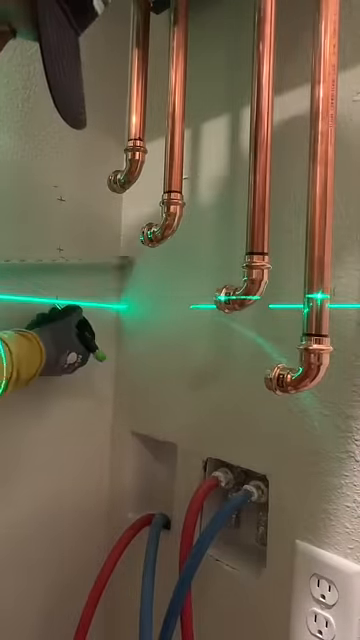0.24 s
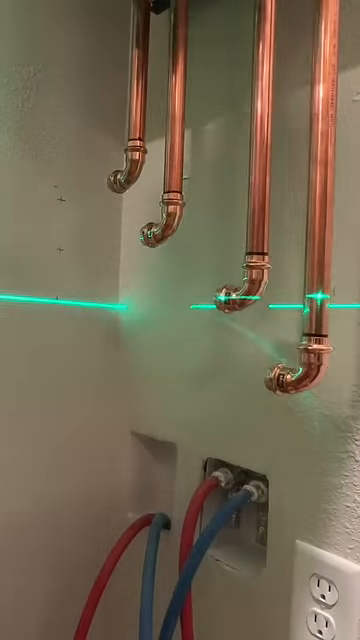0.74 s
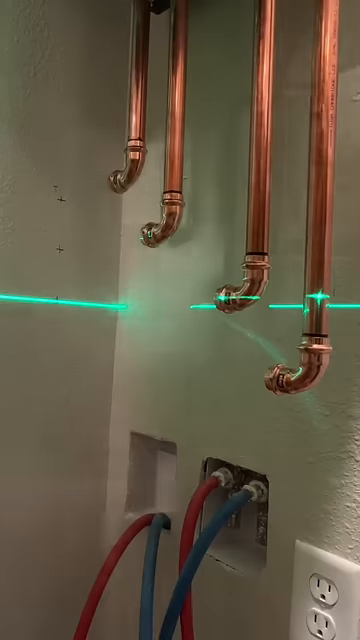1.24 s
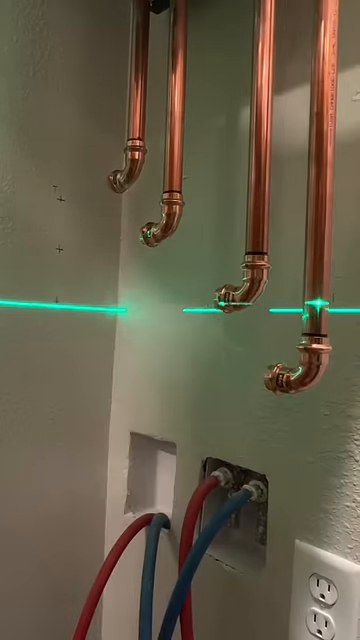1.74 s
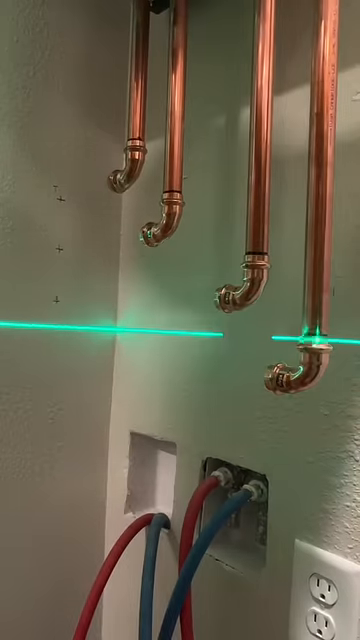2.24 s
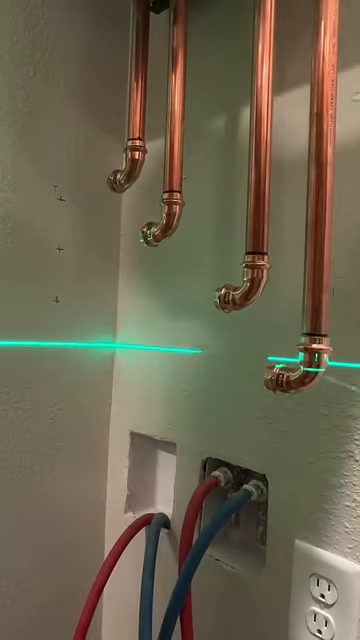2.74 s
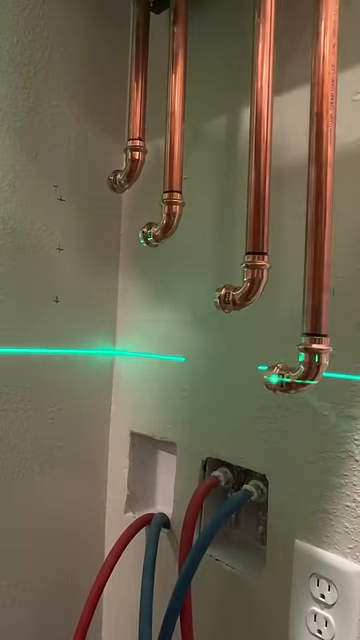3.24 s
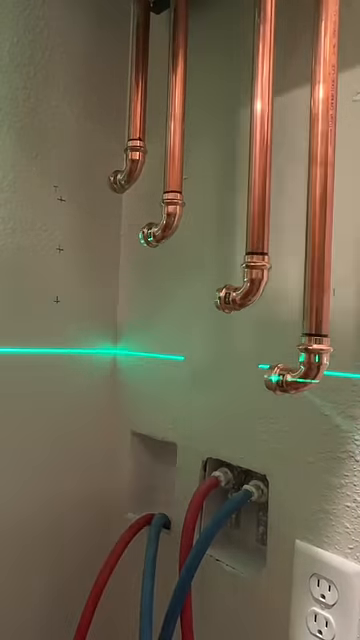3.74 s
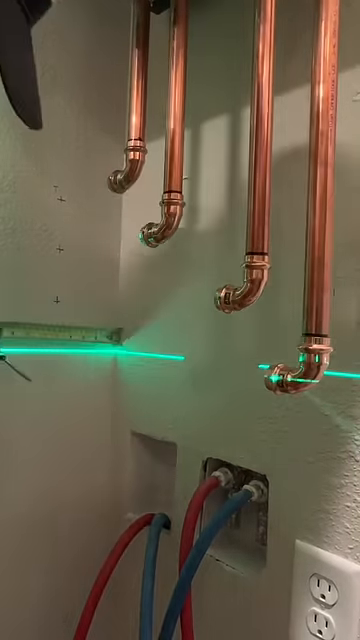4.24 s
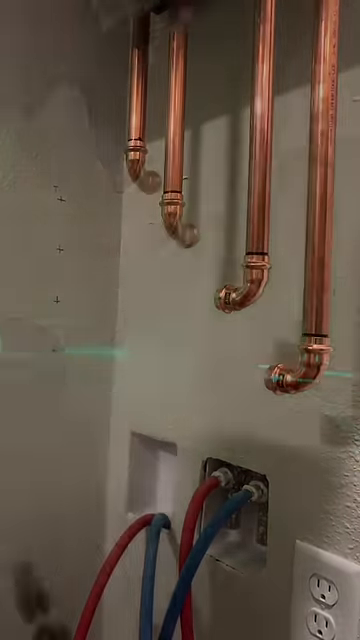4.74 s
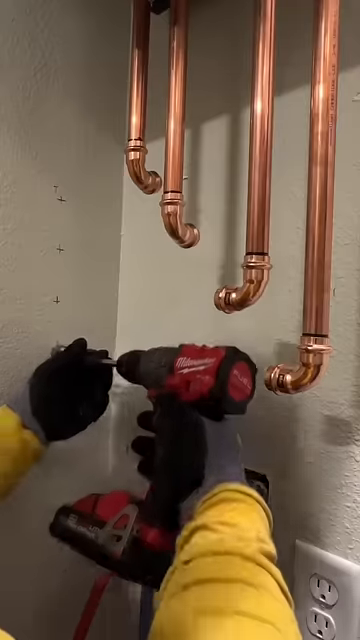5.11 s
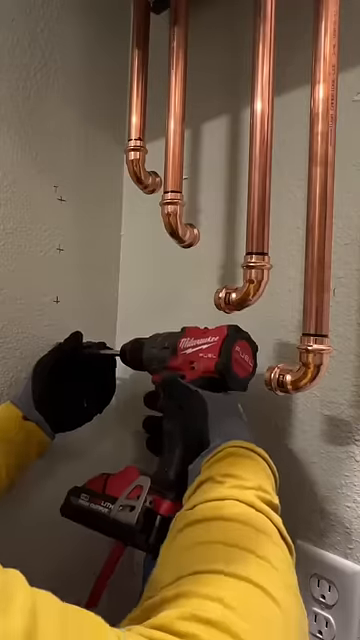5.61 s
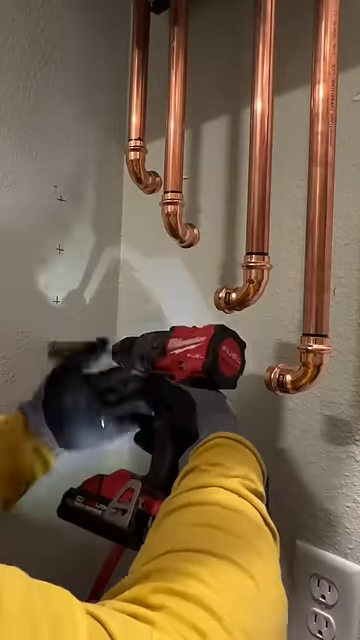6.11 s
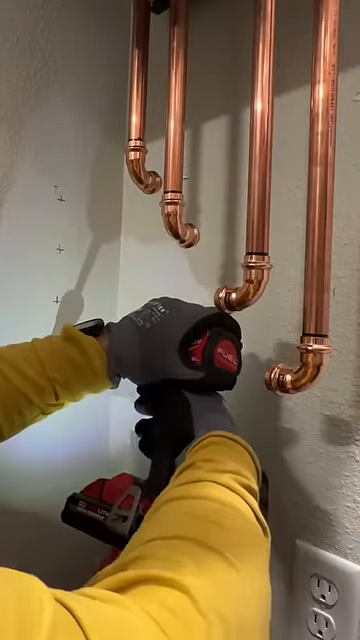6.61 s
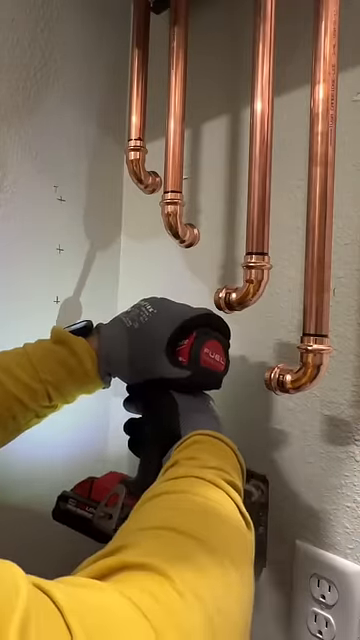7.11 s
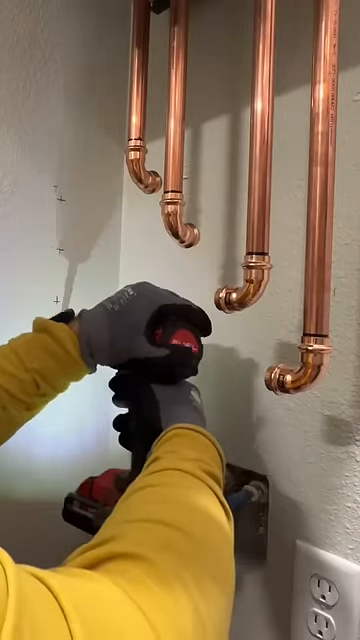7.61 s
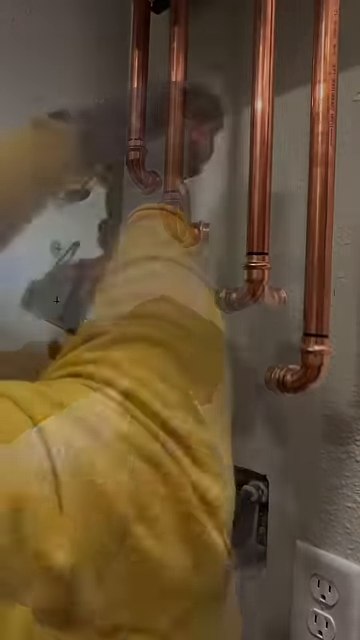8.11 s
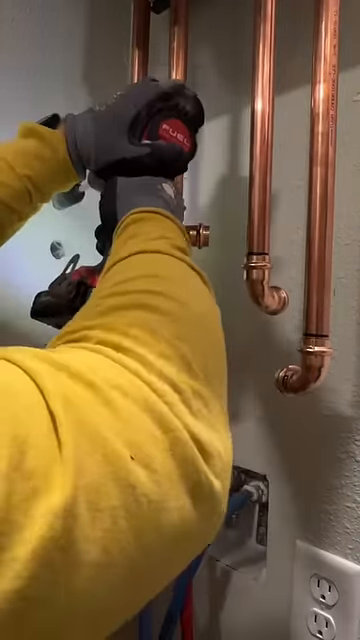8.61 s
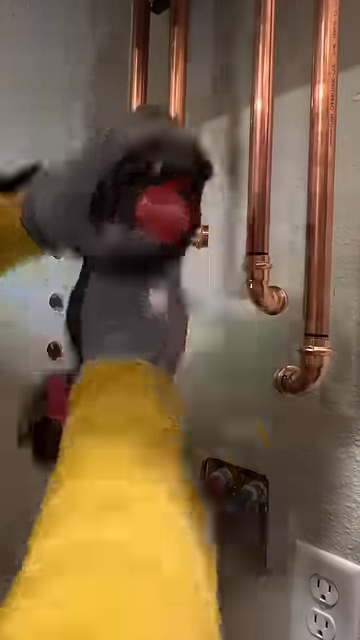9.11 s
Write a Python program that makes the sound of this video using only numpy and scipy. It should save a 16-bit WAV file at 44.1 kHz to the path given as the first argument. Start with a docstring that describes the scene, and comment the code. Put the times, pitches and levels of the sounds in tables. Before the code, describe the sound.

Close handling clatter and hollow wall bumps give way to faint low hums, then a whining power drill pulses, rasps and breaks through a wall.

```python
"""Cloth brushes and a tape measure rattles first, close by in the quiet air of a small bare room.
The tape clacks, hands and tools boom on a hollow plasterboard wall, and a level's stand hums as it is nudged.
Then a cordless drill bites in short trigger pulls and bores through, its bit wobbling.
Coloured noise makes cloth, clacks and rasp; resonators make wall and stand; tone banks make motor and gears.
The stereo microphone also hears echoes off close walls and a short diffuse tail."""
import sys
import numpy as np
from scipy import signal
from scipy.fft import rfft, irfft, next_fast_len
from scipy.io import wavfile

SR = 44100
rng = np.random.default_rng(int(sys.argv[2]) if len(sys.argv) > 2 else 0)


def put_to_file(sound):
    """Save the sound as 16-bit audio at rate SR, in the file named by the first command-line argument."""
    columns = np.atleast_2d(sound).T  # one column per channel
    safe = np.clip(columns, -1, 1)
    whole_steps = np.round(safe * 32767)
    wavfile.write(sys.argv[1], SR, whole_steps.astype(np.int16))


N = 412335
TIME = np.arange(N) / SR


def from_db(db):
    """Decibels to an amplitude factor."""
    return 10 ** (np.asarray(db) / 20)


def rms(x):
    """Root mean square, kept above zero."""
    return np.sqrt(np.mean(x ** 2) + 1e-20)


def decay_rate(t60):
    """Exponential rate of a fall by 60 dB in t60."""
    return np.log(1000) / t60


def in_time(rows):
    """Each column of a curve, sample by sample."""
    s, *columns = np.transpose(rows)
    return [np.interp(TIME, s, c) for c in columns]


def at_hz(points, hz):
    """A spectrum read on a log-frequency axis."""
    point_hz, point_db = np.transpose(points)
    return np.interp(np.log(hz + 1), np.log(point_hz), point_db)


def drift(rate):
    """Smooth chance: straight lines between random knots of spread 1, rate knots a second."""
    knots = rng.standard_normal(4 * 4096)
    return np.interp(TIME * rate, np.arange(len(knots)), knots)


def gate(on, off, rise, t60):
    """An envelope that sets in, holds and runs down."""
    setting_in = np.minimum(TIME - on, 0) / rise
    running_down = decay_rate(t60) * np.maximum(TIME - off, 0)
    return np.exp(np.maximum(setting_in - running_down, -np.log(1e12)))


def swell(s, half_s, squareness=1.61):
    """A rounded hump of height 1."""
    return np.exp(-np.minimum(np.abs((TIME - s) / half_s), 10) ** squareness)


def blows(times, levels_db, t60, rise):
    """An envelope that jumps at each blow and dies away."""
    out, age = np.zeros(N + SR), np.arange(SR) / SR
    for s, db, decay in zip(times, levels_db, np.broadcast_to(t60, len(times))):
        at = max(int(s * SR), 0)
        out[at:at + SR] += from_db(db) * np.exp(-decay_rate(decay) * age) * (1 - np.exp(-age / rise))
    return out[:N]


# stereo spread at the microphone: (frequency [Hz], side minus mid [dB])
SIDE_OVER_MID = [(80, -30.5), (300, -5), (650, -15), (1200, 3.5), (2500, 5.5), (6000, -3.5), (14000, -2.5)]
# stereo balance at the microphone: (frequency [Hz], left minus right [dB])
LEFT_OVER_RIGHT = [(100, -1), (350, -0.5), (700, -2.5), (1400, -2), (2800, 1.5), (5500, 3), (14000, 5)]


def noise(spectrum):
    """Stereo noise of one colour, alike at both ears in the bass and diffuse above; mid rms 1."""
    size = next_fast_len(N, real=True)
    hz = np.arange(size // 2 + 1) * SR / size
    bass_cut = hz ** 2 / (hz ** 2 + 60 ** 2)
    mid, side = rfft(rng.standard_normal((2, size))) * from_db(at_hz(spectrum, hz)) * bass_cut
    sign = np.array([[1], [-1]])   # left, right
    ears = mid + sign * side * from_db(at_hz(SIDE_OVER_MID, hz))
    pair = irfft(ears * from_db(sign * at_hz(LEFT_OVER_RIGHT, hz) / 2), size)[:, :N]
    return pair / rms(pair.mean(axis=0))


def resonate(x, modes):
    """Parallel resonances (frequency [Hz], width [Hz], level [dB]) of alternating sign."""
    out = 0
    for k, (hz, width, db) in enumerate(modes):
        r = np.exp(-np.pi * width / SR)   # pole radius
        gain = (1 - r * r) / 2
        poles = [1, -2 * r * np.cos(2 * np.pi * hz / SR), r * r]
        out = out + (-1) ** k * from_db(db) * signal.lfilter([gain, 0, -gain], poles, x + 1e-18)
    return out


# echoes off the corner and the arm: (delay [s], level [dB])
CORNER_ECHOES = [(.0013, -22.5), (.0031, -16.5), (.0058, -13.5), (.0094, -10), (.0147, -12.5)]


def corner(x):
    """Close walls return a few echoes, a little apart at each ear, that comb the spectrum."""
    out = np.array(x)
    for k, (delay, db) in enumerate(CORNER_ECHOES):
        for ear in (0, 1):
            lag = max(int((delay + 0.00019 * ear * (-1) ** k) * SR), 1)
            out[ear, lag:] += from_db(db) * x[ear, :-lag]
    return out


ROOM_T60_S = .32


def room(x, wet_db):
    """Adds a short diffuse tail from the bare walls."""
    age = TIME[:SR // 2]
    tail = rng.standard_normal((2, len(age))) * np.exp(-decay_rate(ROOM_T60_S) * age)
    tail *= age > .004   # the tail waits 4 ms
    tail /= np.sqrt(np.sum(tail ** 2) / 2)
    return x + from_db(wet_db) * signal.fftconvolve(np.broadcast_to(x, (2, N)), tail, axes=1)[:, :N]


# spectrum of the quiet air: (frequency [Hz], relative density [dB per Hz])
AIR_SPECTRUM = [(40, -16), (120, 0), (260, -5), (420, -12), (630, -11), (1100, -23), (1800, -28),
                (3800, -25), (7000, -35), (16000, -36)]


def air():
    """The room's quiet air is steady coloured noise."""
    return from_db(-67) * noise(AIR_SPECTRUM)


# brushes of sleeves and gloves: (start [s], end [s], relative swish [dB], relative crispness [dB])
BRUSH_MOVES = [(0.01, 0.4, -73, -83.5), (0.614, 1.237, -67, -70.5), (3.699, 3.866, -68, -71.5),
               (3.913, 4.002, -77, -73.5), (4.213, 4.34, -78, -100), (4.627, 4.806, -63.5, -65.5),
               (4.892, 4.908, -85, -81), (5.32, 5.694, -75.5, -82), (6.208, 6.307, -68.5, -72.5),
               (9.198, 9.221, -100, -88)]
# dull and crisp sides of the cloth: (frequency [Hz], relative density [dB per Hz])
SWISH_SPECTRUM = [(60, -18), (110, -9), (260, -7.5), (450, -11.5), (750, -1.5), (1300, -10), (2500, -13.5),
                  (4500, -28.5)]
CRISP_SPECTRUM = [(1180, -39), (2000, -13), (3810, -6.5), (8120, -14), (10400, -10.5), (13200, -10.5),
                  (15200, -9), (16000, -27.5)]
BRUSH_RISE_S, BRUSH_T60_S = 0.16, 1


def sleeves(flutter_db=2.5):
    """Cloth brushes as the arms move: dull and crisp noise, fluttering together."""
    moves = np.array([gate(start, end, BRUSH_RISE_S, BRUSH_T60_S) for start, end, *_ in BRUSH_MOVES])
    swish, crisp = from_db(np.transpose(BRUSH_MOVES)[2:]) @ moves
    cloth = from_db(6.0) * swish * noise(SWISH_SPECTRUM)
    cloth = cloth + from_db(13.0) * crisp * noise(CRISP_SPECTRUM)
    return corner(cloth * from_db(flutter_db * drift(140)))


PATTER_TAPS_PER_S, PATTER_SPREAD_DB, PATTER_TAP_T60_S = 300, 4.5, 0.068


def patter():
    """Quick taps of uneven strength, as an envelope of rms 1."""
    taps = (rng.random(N) < PATTER_TAPS_PER_S / SR) * from_db(PATTER_SPREAD_DB * rng.standard_normal(N))
    envelope = signal.lfilter([1], [1, -np.exp(-decay_rate(PATTER_TAP_T60_S) / SR)], taps + 1e-18)
    return envelope / rms(envelope)


# stretches of patter: the tape's blade rattles as it slides, except at 0.481 s,
# where a brief grain only surrounds the clack: (start [s], length [s], body [dB], clack [dB], tick [dB])
PATTERS = [(0.021, 0.039, -62, -62, -58), (0.185, 0.084, -51, -51.5, -52.5), (0.241, 0.15, -49, -58, -79),
           (0.481, 0.0091, -53, -47, -53), (4.149, 0.035, -40.5, -42, -56),
           (4.19, 0.091, -53.5, -53.5, -51.5), (4.53, 0.018, -55, -54, -61),
           (4.708, 0.027, -53, -51.5, -64)]
# clacks of the tape measure and tools: (time [s], body [dB], clack [dB], tick [dB], ring t60 [s])
TOOL_CLACKS = [(.072, -57, -49, -50, 0.1), (.208, -64, -52, -52, 0.047), (0.308, -39.5, -45, -66, 0.049),
               (0.414, -47, -62, -75, 0.057), (0.4846, -40, -25, -24.5, 0.05),
               (0.827, -57, -53, -51, 0.032), (.9, -63, -69, -61, .06), (0.9911, -45.5, -37.5, -55, 0.028),
               (4.144, -38.5, -45, -36, .04), (4.158, -41, -43, -37.5, .06), (4.28, -47, -47, -39.5, 0.034),
               (4.373, -59, -58, -42.5, 0.044), (4.536, -52, -52, -46, 0.057),
               (4.561, -61, -47.5, -41, 0.038), (4.724, -45, -62, -66, 0.051), (5.7, -55, -48, -52, 0.073),
               (9.006, -61, -45, -43, 0.059)]
# spectra of body, clack and tick, one list each: (frequency [Hz], relative density [dB per Hz])
CLACK_SPECTRA = [
    [(150, -27.5), (400, 0.5), (900, -4), (1200, -1.5), (2000, -45)],
    [(700, -21.5), (1200, 0.5), (1800, -2.5), (2800, -1), (4500, -3.5), (7000, -17.5)],
    [(3000, -21), (5500, -2), (10000, 3.5), (16000, -1.5)],
]
CLACK_RISE_S, PATTER_END_T60_S = 0.00097, 0.18


def clacks(crack_t60=0.018, crack_db=7):
    """Hard things snap with a sharp crack and dense short ring; quick taps patter in the same bands."""
    s, *levels, t60 = np.transpose(TOOL_CLACKS)
    stretches = np.array([gate(start, start + length, CLACK_RISE_S, PATTER_END_T60_S)
                          for start, length, *_ in PATTERS])
    patters = from_db(np.transpose(PATTERS)[2:]) @ stretches * patter()
    out = 0
    for spectrum, db, taps in zip(CLACK_SPECTRA, levels, patters):
        ring = blows(s, db, t60, CLACK_RISE_S)
        crack = blows(s, db + crack_db, crack_t60, rise=0.00017)
        out = out + noise(spectrum) * (ring + crack + taps)
    return room(corner(out), wet_db=-16)


# knocks on the wall: (time [s], relative boom [dB], relative scuff [dB])
WALL_KNOCKS = [(.171, -54, -45.5), (0.246, -38.5, -32.5), (.27, -43, -54), (.323, -65, -48),
               (.367, -43, -28.5), (.389, -42.5, -55), (1, -59.5, -50), (4.163, -65, -33),
               (4.284, -62, -36), (4.394, -54.5, -68), (4.56, -50, -66), (4.643, -52.5, -66),
               (4.716, -49.5, -55), (5.399, -35.5, -30.5), (5.567, -43, -59), (5.602, -40.5, -46),
               (6.147, -52, -57), (6.263, -47.5, -65)]
# modes of the wall: (frequency [Hz], relative level [dB], t60 [s])
WALL_MODES = [(94, -1, 0.46), (113.3, 6, 0.25), (143, -2.5, 0.19), (192, -3.5, 0.18), (256, 5, 0.15),
              (300, -4.5, 0.085), (395, -5.5, 0.076), (492, -6.5, 0.25), (630, -9.5, .1)]
# the scuff on the surface: (frequency [Hz], relative density [dB per Hz])
SCUFF_SPECTRUM = [(180, -32), (320, 1), (750, 8), (1100, -6.5), (1600, -9), (2500, -27.5), (5000, -42)]


def knocks():
    """Hands and tools bump the wall, which booms in its modes under a brief scuff."""
    s, boom_db, scuff_db = np.transpose(WALL_KNOCKS)
    boom = np.zeros(N)
    strengths_db = rng.normal(0, 2, (len(s), len(WALL_MODES)))   # each knock excites the modes unevenly
    for k, (hz, db, t60) in enumerate(WALL_MODES):
        taps = np.zeros(N)
        taps[(s * SR).astype(int)] = from_db(boom_db + db + strengths_db[:, k])
        r, w = np.exp(-decay_rate(t60) / SR), 2 * np.pi * hz / SR
        boom += (-1) ** k * signal.lfilter([0, np.sin(w)], [1, -2 * r * np.cos(w), r * r], taps + 1e-18)
    scuffs = corner(noise(SCUFF_SPECTRUM) * blows(s, scuff_db, t60=0.041, rise=0.0024))
    return room(from_db(0.5) * boom + from_db(3.5) * scuffs, wet_db=-18.0)


# nudges of the stand: (time [s], relative level [dB])
STAND_NUDGES = [(1.319, -45), (1.42, -53), (1.533, -52), (1.669, -51), (1.829, -49.5), (1.934, -50.5),
                (2.002, -50), (2.298, -53.5), (2.416, -53), (2.485, -55), (2.634, -54.5), (2.77, -53),
                (2.875, -53), (2.95, -54)]
# the stand's resonances: (frequency [Hz], width [Hz], relative level [dB])
STAND_MODES = [(93, 2, -1.5), (154.2, 11.7, 4), (228.5, 10, -4.5), (243, 28, -9), (367, 39, -13),
               (505, 180, -17), (664, 21, -9), (705, 4200, -18)]


def stand(soft_hz=780):
    """Each nudge is a short dull rub that sets the stand humming."""
    s, level_db = np.transpose(STAND_NUDGES)
    low_pass = signal.butter(4, soft_hz, fs=SR, output="sos")
    rub = signal.sosfilt(low_pass, rng.standard_normal(N))
    push = blows(s, level_db, t60=0.33, rise=0.0015)
    hum = from_db(5.5) * resonate(rub * push, STAND_MODES) / rms(resonate(rub, STAND_MODES))
    return room(hum, wet_db=-13)


# short pulls of the trigger:
# (on [s], bit bites [s], off [s], motor [dB], wall boom at the bite [dB], rasp at the bite [dB])
TRIGGER_PULLS = [(5.703, 6.011, 6.004, -33.5, -16.5, -18), (6.432, 6.474, 6.45, -28.5, -11.5, -17.5),
                 (6.585, 6.606, 6.655, -28, -17, -21.5), (6.731, 6.779, 6.777, -25.5, -21, -25.5),
                 (6.873, 6.908, 6.95, -29.5, -20, -23), (7.03, 7.063, 7.1, -31, -15.5, -21.5),
                 (7.146, 7.196, 7.205, -30.5, -20.5, -17.5)]
# the gears sing out as the load changes:
# (start [s], end [s], from [Hz], to [Hz], relative level [dB], purity [0-1])
WHINE_BURSTS = [(5.704, 6.002, 6123, 6170, -31, 0.9), (6.438, 6.452, 6223, 6016, -19, .45),
                (6.593, 6.601, 5705, 6296, -16, 0.25), (6.736, 6.75, 6190, 6370, -17, 0.55),
                (6.9, 6.92, 5300, 6230, -17, 0.88), (6.93, 6.942, 5800, 5290, -22, .4),
                (7.032, 7.042, 6000, 5690, -20, 0.54), (7.057, 7.075, 5250, 5520, -15.5, 0.92),
                (7.174, 7.2, 5280, 6250, -16, .9), (7.266, 7.314, 5500, 6962, -29.5, 0.4),
                (7.577, 7.582, 6257, 6356, -22, 0.45), (7.608, 7.613, 6345, 6284, -25, .5),
                (7.641, 7.645, 6400, 6320, -23.5, .5), (7.958, 7.97, 5550, 6080, -16.5, .92),
                (8.23, 8.276, 6200, 6100, -25, .92)]
TRIGGER_RISE_S, RUN_DOWN_T60_S = 0.0016, 0.097
WHINE_RISE_S, WHINE_FADE_T60_S = .005, 0.037
CUT_T60_S = 0.19   # after a short pull the cut dies away more slowly than the motor
BITE_HALF_S, BITE_STRAIN_DB = 0.0334, 6.5   # the motor grows louder as the bit bites
IDLE_BOOM_DB, IDLE_RASP_DB = .5, -5.5   # a bit that only skims the wall, relative to the motor
BORE_ON_S, BREAKTHROUGH_S, BORE_OFF_S = 7.22, 8.95, 9.005   # the long pull


def short_pulls():
    """Gains of boom, rasp, whine and whirr: each pull starts the motor, bites once and lets bursts of whine out."""
    boom = rasp = whirr = 0
    powered = gate(BORE_ON_S, BORE_OFF_S, TRIGGER_RISE_S, RUN_DOWN_T60_S)
    for on, bite_s, off, motor_db, boom_db, rasp_db in TRIGGER_PULLS:
        running = gate(on, off, TRIGGER_RISE_S, RUN_DOWN_T60_S)
        cutting = gate(on, off, TRIGGER_RISE_S, CUT_T60_S)
        bite = swell(bite_s, BITE_HALF_S)
        boom = boom + cutting * (from_db(motor_db + IDLE_BOOM_DB) + from_db(boom_db) * bite)
        rasp = rasp + cutting * (from_db(motor_db + IDLE_RASP_DB) + from_db(rasp_db) * bite)
        powered = np.maximum(powered, running)
        whirr = whirr + running * from_db(motor_db + BITE_STRAIN_DB * bite)
    bursts = [from_db(db) * gate(start, end, WHINE_RISE_S, WHINE_FADE_T60_S)
              for start, end, _, _, db, _ in WHINE_BURSTS]
    whine = powered * np.max(bursts, axis=0)
    return np.array([boom, rasp, whine, whirr])


# steadiness of the gears in the long pull: (time [s], purity of the whine [0-1])
GEAR_PURITY = [(7.33, .3), (7.45, 0.24), (7.6, 0.35), (7.8, 0.35), (7.92, .1), (7.965, .85), (8.04, .7),
               (8.2, 0.82), (8.3, .68), (8.355, .68), (8.38, 0.96), (8.92, 0.85), (8.98, .25)]
# the motor labours when the bit binds and races when it comes free:
# (time [s], length [s], change of the whine [Hz])
LOAD_SWINGS = [(7.731, .2, 449.5), (7.949, .021, -1300), (8.16, .15, 262), (8.325, 0.075, -700),
               (8.719, .036, -580), (8.791, 0.049, -850), (8.89, 0.076, 400)]
WHINE_HZ, SWING_SQUARENESS = 6128, 3.0   # whine before the swings
EASE_OFF_S, SLOW_DOWN_HZ_PER_S = 8.922, 26000   # the trigger is let go and the motor slows


def motor_speed():
    """Pitch and purity of the whine: it glides in each burst, swings with the load and falls away at the end."""
    swings = sum(change_hz * swell(s, length / 2, SWING_SQUARENESS) for s, length, change_hz in LOAD_SWINGS)
    slowing = SLOW_DOWN_HZ_PER_S * np.maximum(TIME - EASE_OFF_S, 0)
    hz = np.maximum(WHINE_HZ + swings - slowing, 0)
    purity, = in_time(GEAR_PURITY)
    for start, end, from_hz, to_hz, _, pure in WHINE_BURSTS:
        inside = (TIME > start - WHINE_RISE_S) & (TIME < end + 2 * WHINE_RISE_S)
        hz = np.where(inside, np.interp(TIME, [start, end], [from_hz, to_hz]), hz)
        purity = np.where(inside, pure, purity)
    return hz, purity


# gear tones: (multiple of the whine, level running free [dB], level under load [dB], smear [Hz])
TOOTH_TONES = [(1, 0, 0, 30), (1.0075, -7, -26, 40), (1.038, -4, -20, 40), (1.31, -32, -11, 60),
               (1.5, -30, -21, 120), (1.925, -3, -21, 130), (2.42, -15, -15, 200)]
# hiss of unsteady gears: (frequency [Hz], relative density [dB per Hz])
GEAR_HISS_SPECTRUM = [(3500, -43.5), (5000, -12), (5450, -3), (5850, -8.5), (6300, 0), (6800, -16.5),
                      (8000, -34)]


def gears(whine_hz, purity, load, wobble, jitter=0.0045, lag_s=.00004):
    """Tooth tones give way to hiss as purity falls; they flutter less when the bit wobbles."""
    unsteady_hz = whine_hz * (1 + jitter * (0.066 + load) * drift(500))
    phase = 2 * np.pi * np.cumsum(unsteady_hz) / SR
    phase = np.array([phase, phase + 2 * np.pi * whine_hz * lag_s])
    flutter_db = 3 - 2 * wobble
    tones = 0
    for multiple, free_db, loaded_db, smear_hz in TOOTH_TONES:
        level = from_db(free_db + load * (loaded_db - free_db) + flutter_db * drift(70))
        smear = 2 * np.pi * np.cumsum(smear_hz * drift(900)) / SR
        tones = tones + level * np.sin(multiple * phase + smear)
    purity = np.clip(purity, 0, 1)
    singing = from_db(5.5) * purity * tones * from_db([[1.2], [-1.2]])
    return singing + from_db(-3.5) * np.sqrt(1 - purity ** 2) * noise(GEAR_HISS_SPECTRUM)


# the board under the bit: (frequency [Hz], width [Hz], relative level [dB])
BOARD_MODES = [(93, 8.9, 3), (114.8, 11.7, 6), (183.6, 32, 0), (237.3, 44.6, 2.5), (288.6, 39, 2.5),
               (372, 69, 1.5), (464.4, 66, -1), (585.4, 11, -3.5)]


def board(boom, wobble, catch, grain_db=2.5, chatter_hz=312):
    """Crumbling plaster, a chattering edge and the catching bit shake the hollow wall."""
    crumbs = rng.standard_normal(N) * (rng.random(N) < 2500 / SR)
    crumbs = crumbs * from_db(grain_db * rng.exponential(1, N))
    unsteady_hz = chatter_hz * (1 + .1 * drift(9) + 0.0963 * drift(150))
    chatter = np.sin(2 * np.pi * np.cumsum(unsteady_hz) / SR) * from_db(3 * drift(25))
    crumbs, chatter, catch = (x / rms(resonate(x, BOARD_MODES)) for x in (crumbs, chatter, catch))
    force = np.sqrt(1 - wobble ** 2) * (0.85 * crumbs + 0.38 * chatter) + 0.64 * wobble * catch
    return resonate(boom * force, BOARD_MODES)


def aside(x, lean_db=1.0, lag_s=0.00019):
    """A sound from the hole: a little later and weaker on the left."""
    return np.array([np.interp(TIME - lag_s, TIME, x) * from_db(-lean_db), x * from_db(lean_db)])


def rings(modes, shift_db, wander):
    """Resonances that swell, fade and bend in turn as the drill leans in its hole."""
    out = 0
    for hz, width, db in modes:
        grain = .5 * rng.standard_normal((2, N)) + aside(rng.standard_normal(N))
        ring = resonate(grain, [(hz, width, 0)])
        bent = np.cumsum(1 + wander * drift(12)) / SR   # uneven playing time bends the pitch
        ring = np.array([np.interp(bent, TIME, ear) for ear in ring])
        out = out + ring / rms(ring) * from_db(db + shift_db * drift(18))
    return out


# the bit snatches in the short pulls, plaster cracks away in the long one: (time [s], relative level [dB])
SNATCHES_AND_CRACKS = [(6.462, -15), (6.49, -13), (7.049, -17), (7.109, -16.5), (7.885, -9), (7.914, -11),
                       (8.847, -11), (8.857, -16), (8.867, -10.5), (8.924, -10)]
# the burst of both: (frequency [Hz], relative density [dB per Hz])
BURST_SPECTRUM = [(150, -21.5), (400, -7.5), (950, 3), (1300, -1.5), (2000, -14.5), (4000, -20.5),
                  (16000, -32)]


def snatches_and_cracks(t60=0.036, rise=0.001):
    """The bit snatches in the short pulls and plaster cracks away in the long one: short bursts of noise."""
    s, db = np.transpose(SNATCHES_AND_CRACKS)
    return noise(BURST_SPECTRUM) * blows(s, db, t60, rise)


# the cutting edge groans: (start [s], end [s], from [Hz], to [Hz], relative level [dB])
EDGE_GROANS = [(6.489, 6.503, 301.4, 278.7, -17), (6.598, 6.62, 241.6, 306, -15.5),
               (7.106, 7.113, 337.4, 431.5, -20), (7.158, 7.18, 259, 400, -18.5),
               (7.308, 7.361, 289.5, 291.9, -23), (7.411, 7.452, 270, 295.4, -27),
               (7.624, 7.715, 255, 304.8, -21), (7.726, 7.858, 314.8, 335, -24.5),
               (7.886, 7.896, 930, 957, -19.5), (8.03, 8.151, 384.7, 410.4, -24.5),
               (8.277, 8.351, 852, 876, -24.5)]


def chattering(rise_s=.006, t60=.08, jitter=0.03995, flutter_db=2, overtone_db=-13):
    """The cutting edge sticks and slips in a rough groan of three harmonics."""
    hz, level = np.full(N, 300.), 0
    for start, end, from_hz, to_hz, db in EDGE_GROANS:
        hz = np.where(TIME > start - rise_s, np.interp(TIME, [start, end], [from_hz, to_hz]), hz)
        level = np.maximum(level, from_db(db) * gate(start, end, rise_s, t60))
    phase = 2 * np.pi * np.cumsum(hz * (1 + jitter * drift(200))) / SR
    groan = sum(from_db(overtone_db * k) * np.sin((k + 1) * phase) for k in range(3))
    return aside(np.sqrt(2) * level * groan * from_db(flutter_db * drift(80)), lean_db=1)


# the cutting during the long pull, before trim: (time [s], wall boom [dB], rasp [dB])
LONG_CUT = [(7.25, -30, -31), (7.32, -33.5, -25.5), (7.394, -28, -26.5), (7.422, -21, -28.5),
            (7.606, -25, -27), (7.656, -24, -25.5), (7.88, -25.5, -24.5), (8.046, -19, -20),
            (8.11, -24.5, -27.5), (8.336, -20, -20.5), (8.368, -21, -29.5), (8.476, -14, -31),
            (8.826, -30.5, -25), (8.854, -32.5, -22), (8.94, -31, -32)]
# the drill during the long pull, before trim: (time [s], motor [dB], whine [dB])
LONG_DRIVE = [(7.27, -37.5, -31.5), (7.384, -34, -35), (7.56, -33.5, -27.5), (7.9, -36.5, -38.5),
              (7.944, -25, -22), (8.078, -26, -24), (8.256, -31, -23.5), (8.6, -36.5, -25.5),
              (8.92, -42.5, -33.5), (8.99, -46, -39.5)]
BOOM_TRIM_DB, RASP_TRIM_DB, MOTOR_TRIM_DB, WHINE_TRIM_DB = 1.33, 2, 2.5, 1


def long_pull():
    """Gains of boom, rasp, whine and whirr: the cut ends at the breakthrough, the motor a moment later."""
    boom_db, rasp_db = in_time(LONG_CUT)
    motor_db, whine_db = in_time(LONG_DRIVE)
    cutting = gate(BORE_ON_S, BREAKTHROUGH_S, TRIGGER_RISE_S, RUN_DOWN_T60_S)
    running = gate(BORE_ON_S, BORE_OFF_S, TRIGGER_RISE_S, RUN_DOWN_T60_S)
    return np.array([cutting * from_db(boom_db + BOOM_TRIM_DB), cutting * from_db(rasp_db + RASP_TRIM_DB),
                     running * from_db(whine_db + WHINE_TRIM_DB), running * from_db(motor_db + MOTOR_TRIM_DB)])


# the bit catches once a turn: (time [s], wobble [0-1])
BIT_WOBBLE = [(7.2, 0.02), (8.19, 0.08), (8.235, 0.85), (8.275, .8), (8.3, .25), (8.355, 0.34),
              (8.39, 0.93), (8.62, 0.93), (8.68, 0.25)]
# rasp of the cut and whirr of the motor: (frequency [Hz], relative density [dB per Hz])
RASP_SPECTRUM = [(300, -8.5), (520, -1), (630, -1.5), (730, -2), (860, 3.5), (1100, -0.5), (1400, -11),
                 (2000, -12), (3500, -17), (8000, -27)]
WHIRR_SPECTRUM = [(100, -18.5), (250, 5), (900, 4.5), (2000, 1.5), (3600, 8), (5000, 5.5), (7000, 7.5),
                  (8500, -5.5), (9700, 5), (12000, 4.5), (13500, 2.5), (15200, -5.5), (16500, -29)]
# rings of the steel bit and the hole's rim: (frequency [Hz], width [Hz], relative level [dB])
BIT_MODES = [(624.4, 22, -9), (854, 67, -8.5), (1050, 130, -9), (1233, 86, -14.5), (1539, 61, -9),
             (2218, 76, -16.5), (3000, 76, -14.5), (3720, 74, -18)]
# rings of the drill's casing and chuck: (frequency [Hz], width [Hz], relative level [dB])
CASING_MODES = [(2940, 110, -15), (3580, 160, -14), (4720, 150, -18), (9450, 450, -19), (15100, 320, -10)]
WHINE_PER_ROTOR_TURN, WHINE_PER_BIT_TURN = 12, 106   # whine cycles in a turn
WOBBLE_SAG_HZ, CATCH_S = 110, 8.451   # each catch drags the whine down; time of one catch


def drill():
    """The motor whirrs, the gears whine, and the bit rasps and pounds once a turn."""
    boom, rasp, whine, whirr = short_pulls() + long_pull()
    whine_hz, purity = motor_speed()
    wobble = np.clip(in_time(BIT_WOBBLE)[0], 0, 1)
    load = np.clip(np.maximum(boom, rasp) / from_db(-25.5), 0, 1) ** 2

    angle = 2 * np.pi * np.cumsum(whine_hz) / WHINE_PER_BIT_TURN / SR
    angle = angle - np.interp(CATCH_S, TIME, angle)
    turn = np.cos(angle)   # 1 at each catch
    throb = np.exp(1.9 * wobble * turn) / np.sqrt(np.i0(3.8 * wobble))   # mean power 1 over a turn
    judder = wobble ** 2 * np.exp(1.5 * (turn - 1)) * np.cos(5 * angle)   # the edge skips at each catch
    catch = np.exp(30 * (turn - 1)) * from_db(drift(60))   # one short shove a turn

    rotor_hz = whine_hz * (1 + 0.0144 * (0.295 + load) * drift(120)) / WHINE_PER_ROTOR_TURN
    rotor = 2 * np.pi * np.cumsum(rotor_hz) / SR
    buzz = sum((1 + drift(50) / 2) * np.sin(k * rotor + rng.uniform(0, 2 * np.pi)) for k in range(5, 11))

    grit = from_db(load * 2.16 * drift(450))   # the cutting edge chips unevenly
    scrape = from_db(-3.5) * noise(RASP_SPECTRUM)
    scrape = scrape + from_db(-2.5) * rings(BIT_MODES, shift_db=4.5, wander=.012)
    cutting = rasp * scrape * grit * throb ** 0.33
    casing = from_db(1.0) * noise(WHIRR_SPECTRUM) + rings(CASING_MODES, shift_db=3.5, wander=.012)
    motor = whirr * (casing * grit ** 1.3 * (1 + np.cos(rotor)) + from_db(-11.5) * buzz)
    sagging_hz = whine_hz - WOBBLE_SAG_HZ * wobble * turn
    whining = whine * throb * gears(sagging_hz, purity, load, wobble)

    wall = from_db(0.5) * board(boom, wobble, catch) + boom * judder
    wall = wall * from_db([[-.8], [.8]])   # leans right
    near = room(corner(cutting + snatches_and_cracks() + motor + whining), wet_db=-20.0)
    return near + room(wall + chattering(), wet_db=-21.5)


def scene():
    """All the work, over the quiet air of the room."""
    return air() + sleeves() + clacks() + knocks() + stand() + drill()


def record(dry):
    """The microphone sheds deep bass, peaks are rounded and the top is cut above 16 kHz."""
    thin = signal.sosfilt(signal.butter(2, 60, "high", fs=SR, output="sos"), dry)
    rounded = .8 * np.tanh(thin / .8)
    return signal.sosfilt(signal.ellip(10, .2, 80, 16000, fs=SR, output="sos"), rounded)


dry = scene()
out = record(dry)
put_to_file(out)
```